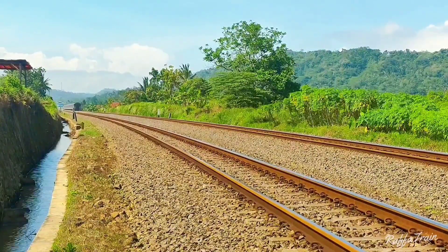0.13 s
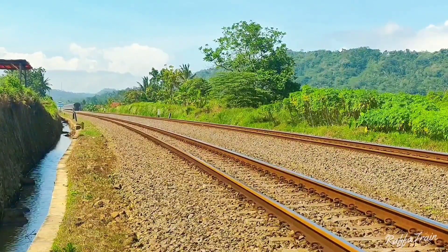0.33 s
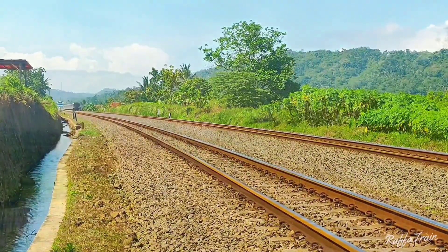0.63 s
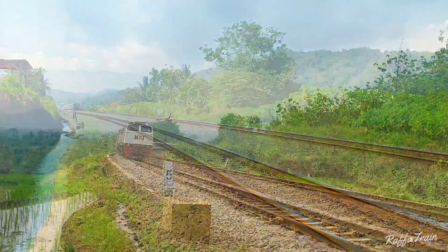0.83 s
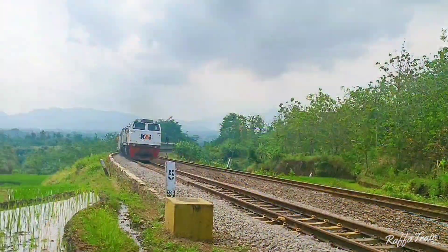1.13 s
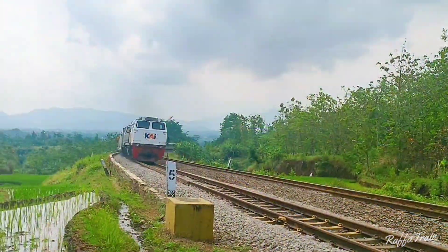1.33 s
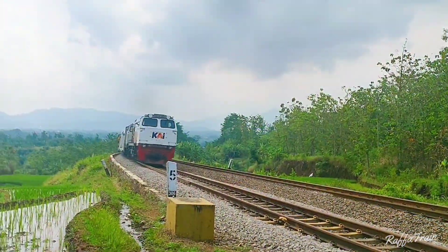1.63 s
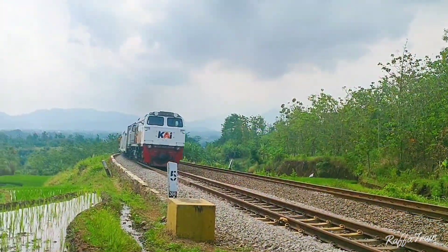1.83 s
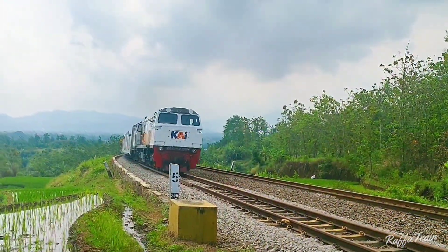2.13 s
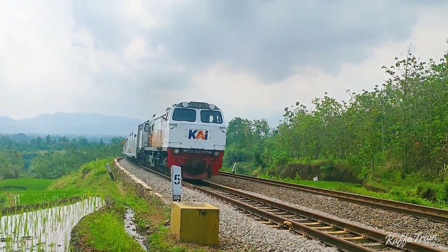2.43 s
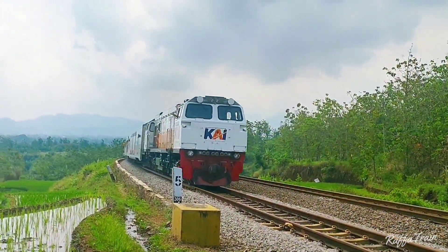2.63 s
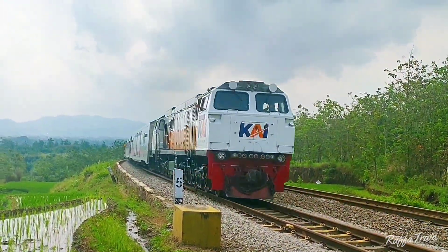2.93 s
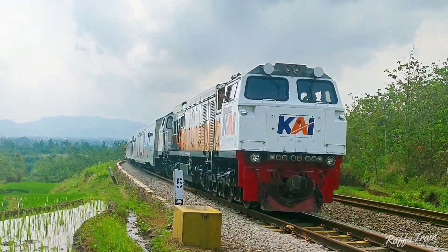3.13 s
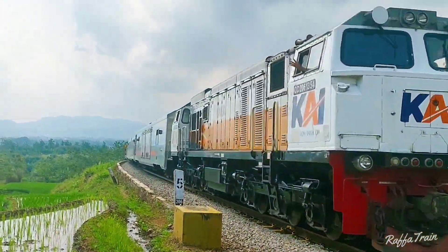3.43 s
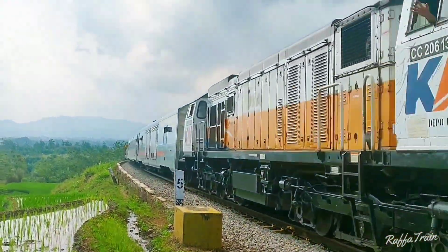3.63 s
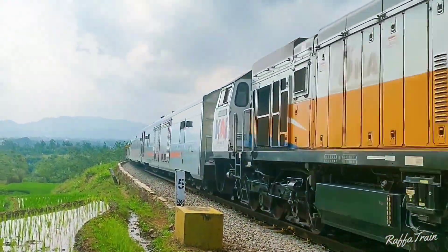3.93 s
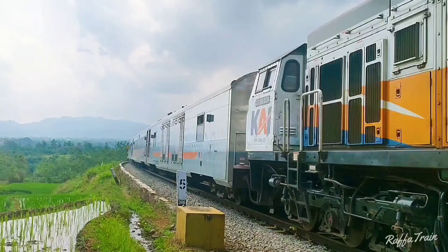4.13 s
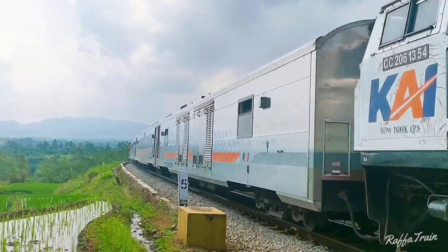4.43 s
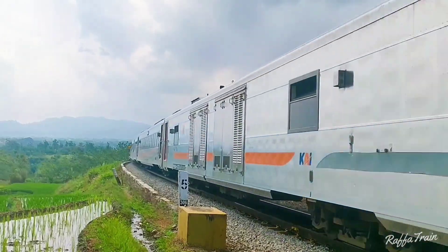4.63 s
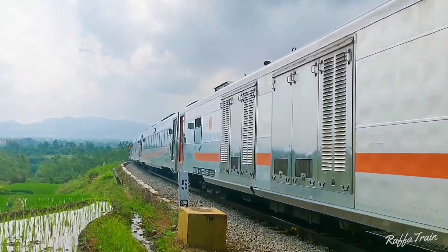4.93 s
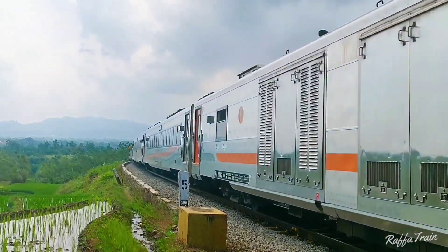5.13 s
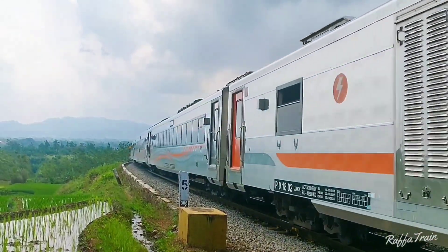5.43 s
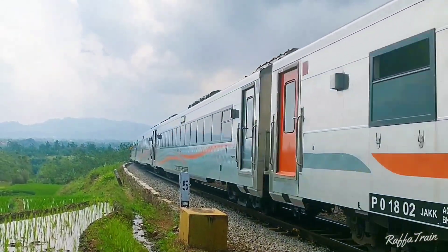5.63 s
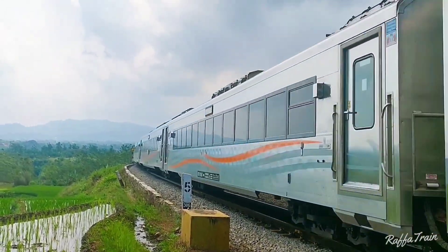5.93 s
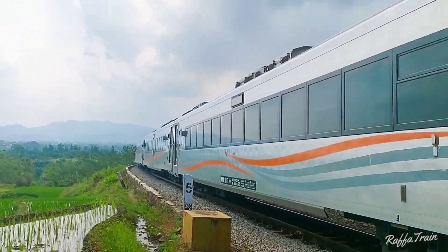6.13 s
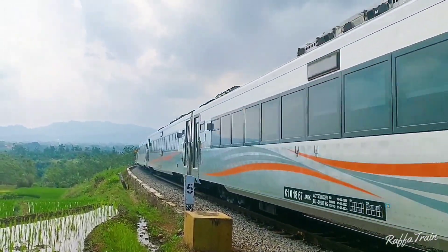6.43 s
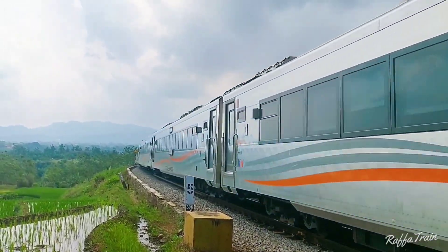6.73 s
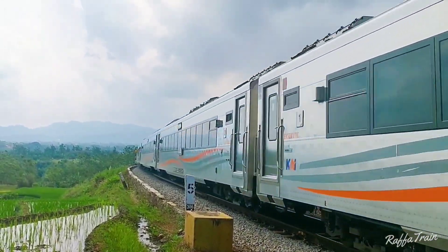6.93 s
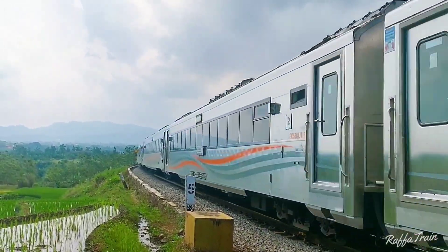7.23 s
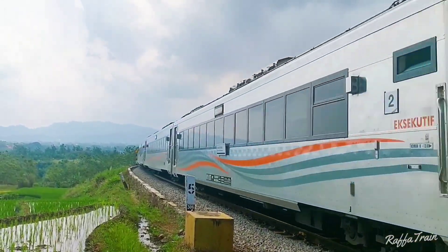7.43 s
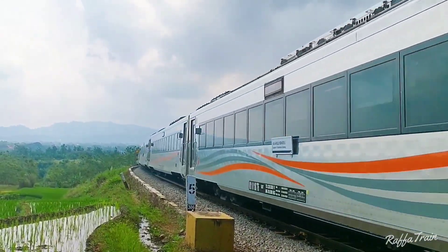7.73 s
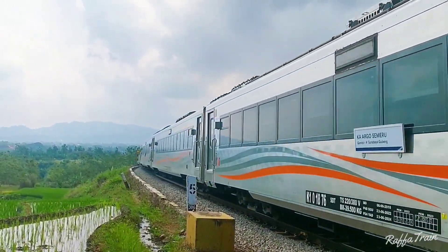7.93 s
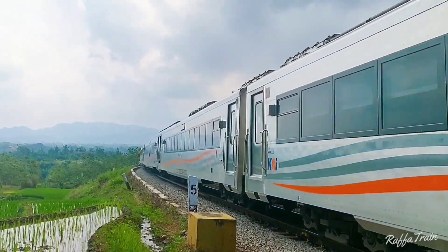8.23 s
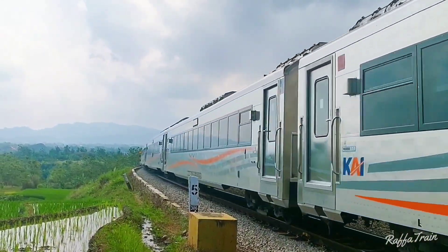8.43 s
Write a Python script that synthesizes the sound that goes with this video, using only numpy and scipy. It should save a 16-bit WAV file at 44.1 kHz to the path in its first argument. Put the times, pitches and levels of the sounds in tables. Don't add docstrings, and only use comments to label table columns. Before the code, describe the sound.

From 0 to about 0.6 s there is only a faint, dull rumble of a distant train, fading into a nearer outdoor scene. At about 0.65 s a two-note air horn blares, reedy and beating; its bright tone closes near 1.35 s, deeper tones linger to 1.8 s and a soft, dull echo trails over the fields. A low diesel throb then grows, with rolling roar swelling from 2.5 s. Around 3.5 to 4.5 s the locomotive passes very close: pulsing exhaust, high turbocharger and gear whine, a burst of fan air, loose metal knocks. From 4.3 s wheels bang over joints, while a generator drone peaks around 4.6 to 5 s, dropping in pitch. Coaches continue to 8.5 s with airy hiss swelling at each set of wheels, sharp ringing clacks and duller farther thuds in uneven clusters, still passing when it ends.

```python
import sys
import numpy as np
from scipy import signal
from scipy.fft import rfft, irfft, next_fast_len
from scipy.io import wavfile
from scipy.ndimage import uniform_filter1d, map_coordinates

SR = 44100
rng = np.random.default_rng(int(sys.argv[2]) if len(sys.argv) > 2 else 0)


def wav_out(sig):
    wavfile.write(sys.argv[1], SR, np.round(np.clip(np.atleast_2d(sig).T, -1, 1) * 32767).astype(np.int16))


def gain_from_db(level_db):
    decades = np.asarray(level_db, float) / 20
    return 10 ** decades


N = 377937

# f/Hz, level/dB per Hz; then t/s, level/dB
FAR_SPECTRUM = [(12, -39), (20, -18), (76, 2.5), (135, 0.5), (387, -18), (753, -10), (2410, -23.5),
                (3270, -36.5), (3760, -56), (5850, -38), (8160, -37), (9370, -50), (15000, -67.5)]
FAR_LEVEL = [(0, -48), (.45, -50), (1.1, -63)]
FADE_START_S, FADE_S = 0.41, 0.75

# f/Hz, level/dB per Hz
RUMBLE = [(12, -52), (20, -13), (48, -11.5), (144, 3), (260, -7.5), (340, -20), (570, -120)]
ROLLING = [(100, -39), (170, -2.5), (281, -2.5), (393, -5.5), (546, -7.5), (901, -17.5), (1010, -17),
           (1500, -39.5), (1950, -49), (3300, -120)]
RAIL = [(650, 0.5), (1100, -2.5), (1270, -3), (1570, -4), (2250, -0.5), (2930, -5), (3840, -14.5),
        (4200, -15.5), (5460, -27), (9240, -120)]
HISS = [(2240, -24), (3800, -14.5), (4760, -9), (5940, -3.5), (6580, 0.5), (7630, -4.5), (8520, -4.5),
        (9560, -13.5), (10500, -22.5), (13600, -51), (22000, -120)]
AIR = [(5880, -27), (10000, -1), (11400, -0.5), (12700, -7.5), (14900, -4), (15700, -10)]
# head of train level/dB, closest t/s, approach/s, leaving/s, extra ground loss/factor,
# coaches level/dB, bogie swell/dB, share of screening/factor
LAYERS = [
    (-32, 3.98, 1.23, 1.1, 1.4, -58, .3, 0.54),
    (-31.3, 3.88, .56, 1.5, 1.83, -40, 2, 1.4),
    (-39.5, 4.26, 0.56, 1.27, 1, -45.5, 2, 1.2),
    (-31, 4.63, 0.6, 1.21, 1.02, -42.5, 7.5, 1.14),
]
# t/s, level/dB
PATH = [(0, 0), (1.2, 2.5), (1.8, 0), (2.4, -2), (3.0, 0.5), (3.35, 0.5), (3.7, 0.5), (4.0, 0.5), (4.5, 0),
        (4.9, 0), (5.25, 2), (5.5, -0.5), (5.9, 1), (6.3, 1.5), (6.9, -0.5), (7.3, 1), (7.8, 0),
        (8.57, -0.5)]

SPEED_M_S, COACH_M, BOGIES_M, AXLES_M = 15.3, 20.95, 13.97, 2.19
FIRST_AXLE_S = 4.286
BOGIE_LAG_S, BOGIE_S = 0.24, 0.127

# t/s, f/Hz
CYCLE = [(0, 9.16), (2.5, 9.135), (4.05, 9.11), (4.43, 8.95), (4.7, 8.63), (5.1, 8.46), (8.57, 8.45)]
# t/s, level/dB
EXHAUST = [(0.4, -29.5), (1.19, -30.5), (1.79, -29.5), (1.97, -24.5), (2.22, -28), (2.61, -23), (3.15, -25),
           (3.38, -29), (3.99, -27.5), (4.11, -32), (4.49, -19), (4.75, -35), (5.2, -31), (5.72, -26),
           (6.2, -25.5), (7.11, -28), (7.98, -37), (8.57, -37)]
# multiple of the cycle, level/dB
ORDER_LEVELS = [(4, -14), (5, -31), (6, -22), (7, -25), (8, -16), (9, -22), (10, -20), (11, -11), (12, 1),
                (13, -9), (14, -8), (15, -6), (16, -12), (17, -3), (18, -11), (19, -12), (20, -13),
                (21, -7), (22, -24), (23, -13), (24, -22), (25, -13), (26, -16), (27, -25), (28, -16),
                (29, -14), (30, -18), (31, -23), (32, -30), (33, -24)]
# level/dB, closest t/s, approach/s, leaving/s, level from afar/dB
STACK = (-14, 4, 0.36, 0.2, -30.5)
# level/dB, closest t/s, approach/s, leaving/s
TURBO = (-37.5, 4.4, .68, 1.1)
GEARS = (-33, 4, 0.54, .5)

# t/s, f/Hz
LOW_PITCH = [(.7, 299), (.75, 297.3), (.8, 296.7), (2.2, 296.6)]
HIGH_PITCH = [(.6, 409), (.705, 412), (.725, 434), (.8, 432.2), (2.2, 432)]
# f/Hz, level/dB
LOW_TONES = [(297, -5), (593, 0.5), (890, -1.5), (1187, 6.5), (1483, -3.5), (1780, -6), (2077, -24),
             (2374, 3), (2670, -12.5), (3260, -22.5), (4500, -19.5), (5900, -12), (7100, -14.5),
             (8600, -16.5), (10000, -44), (15000, -57)]
HIGH_TONES = [(432, 2), (824, 6), (864, 4.5), (1297, -1.5), (1729, -15), (2161, -15), (2470, 1),
              (2593, -18), (3025, -20.5), (5400, -27), (5620, -18), (6050, -14), (8200, -22), (15000, -70)]
# start t/s, deep overtones level/dB, bright overtones level/dB, deep swell/dB per s,
# deep hang until t/s, then fall/dB per s, reed start/s
BELLS = [
    (0.69, -25, -36, -3, 1.8, 90, 0.056),
    (0.629, -37.5, -28.5, 10, 1.72, 90, .115),
]
SHUT_S, SAG_DB_S, BRIGHT_FALL_DB_S, ATTACK_DB = 1.34, 5.5, 58, 21.5
ECHO_DB, ECHO_T60_S, ECHO_TOP_HZ, ECHO_SMEAR_HZ = -26, 1.5, 1300, 160

# f/Hz, level/dB per Hz
FANS = (-37.5, 4, 0.25, 0.13)
FAN_AIR = [(800, -40), (1100, 1), (1700, -3.5), (2400, -37)]

# t/s, peak level/dB, thud f/Hz, ring
# level/dB, rattle level/dB
KNOCKS = [(3.47, -13, 330, -26, -30), (3.798, -18, 224, -28, -15), (4.019, -18, 466, -20, -14),
          (4.654, -11.5, 237, -22, -28), (4.694, -14.5, 298, -12, -20), (5.075, -16, 252, -20, -11),
          (5.135, -11.5, 270, -11, -17), (5.262, -14.5, 300, -12, -24)]
# axle arrival after the nearest joint t/s, peak level/dB, thud f/Hz, ring level/dB,
# rattle level/dB, swell/s
JOINTS = [
    (0, -10.5, 460, -10.5, -20.5, .011),
    (.758, -6.5, 258, -22.5, -36, 0.0078),
    (.992, -8.5, 275, -28, -31, .009),
]
AXLE_DB = [(0, -1, -0.97, -1), (0, -0.92, -0.51, -1.5), (0, -1, 1, -2.5)]
AXLE_RING_DB = [0, 3, -1.5, 2.5]
AXLE_RATTLE_DB = [-4, 3, -1, 4]
VEHICLE_DB = [-5, -0.5, 0, 0.5]
VEHICLE_RING_DB = [-9, 0, 0, 1]
# f/Hz, width/Hz, level/dB
WHEEL = [(800, 330, -3), (1984, 83, 1.5), (2125, 26, 6), (2370, 117, 0.5), (2630, 150, -7.5)]
# f/Hz, level/dB per Hz
RATTLE = [(1760, -31), (3000, -2.5), (4210, -8), (5760, -5), (8430, -0.5), (12800, -19), (13900, -22),
          (15700, -26)]

# t/s, firing f/Hz, level/dB
VAN = [(3.9, 151, -47), (4.45, 150.4, -20), (4.65, 148, -12), (5.03, 142.6, -13), (5.12, 141.2, -27.5),
       (6.5, 140.5, -24.5), (6.9, 140.5, -32), (7.2, 140.5, -24), (7.4, 140.5, -32.5), (8.57, 140.5, -37.5)]
# multiple of the shaft, level/dB
VAN_ORDERS = [(1, -33), (3, -1.5), (5, -14.5), (6, -21.5)]

# f/Hz, level against the neighbourhood/dB
MASKING = [(1500, -38), (2500, -3.5), (3500, 2), (5100, 2), (6200, -1.5), (8500, 0.2), (9800, 2),
           (13000, 2.5), (14200, 2.5), (15500, 1.7)]


def unit(x):
    return x / np.sqrt(np.mean(x ** 2, axis=-1, keepdims=True) + 1e-20)


def along(points, hz):
    f, v = np.transpose(points)
    return np.interp(np.log(hz + 1), np.log(f + 1), v)


def curves(rows):
    s, *cols = np.transpose(rows)
    return [np.interp(np.arange(N) / SR, s, c) for c in cols]


def wobble(rate, size=N):
    knots = rng.standard_normal(int(N * 60 / SR) + 4)
    return map_coordinates(knots, [np.arange(size) * min(rate, 59) / SR], order=1)


def turns(hz):
    return 2 * np.pi * np.cumsum(hz) / SR


def rush(spectrum, patchy_db):
    z = signal.stft(rng.standard_normal(N + 512), nperseg=512)[2]
    field = uniform_filter1d(uniform_filter1d(rng.standard_normal(z.shape), 5, 0), 10, 1)
    x = signal.istft(z * gain_from_db(patchy_db * field / field.std()), nperseg=512)[1]
    m = next_fast_len(len(x))
    gain = gain_from_db(along(spectrum, np.fft.rfftfreq(m, 1 / SR)))
    return unit(irfft(rfft(x, m) * gain, m)[:N])


def passing(db, at_s, approach_s, leaving_s):
    t = np.arange(N) / SR - at_s
    return db - 10 * np.log10(1 + (t / np.where(t < 0, approach_s, leaving_s)) ** 2)


def distance():
    return gain_from_db(curves(FAR_LEVEL)[0] + 1.5 * wobble(10.2)) * rush(FAR_SPECTRUM, patchy_db=2.2)


def fade():
    return np.clip((np.arange(N) / SR - FADE_START_S) / FADE_S, 0, 1)


def axles():
    vehicle_m = COACH_M * np.arange(len(VEHICLE_DB))[:, None]
    metres = vehicle_m + [0, AXLES_M, BOGIES_M, BOGIES_M + AXLES_M]
    return FIRST_AXLE_S + metres / SPEED_M_S


def layer_db(db, at_s, approach_s, leaving_s, loss, coaches_db, swell_db, screened):
    t = np.arange(N) / SR
    bogie_starts = axles()[:, ::2].ravel()
    bogies = sum(np.exp(-((t - s - BOGIE_LAG_S) / BOGIE_S) ** 2) for s in bogie_starts)
    head = db + loss * passing(0, at_s, approach_s, leaving_s)
    coaches = passing(coaches_db, at_s + 1, approach_s, 27) + swell_db * bogies
    return 10 * np.log10(gain_from_db(2 * head) + gain_from_db(2 * coaches)) + screened * curves(PATH)[0]


def roar():
    rumble_db, rolling_db, rail_db, hiss_db = (layer_db(*row) for row in LAYERS)
    shake = wobble(14)
    rumble = gain_from_db(rumble_db + 9) * rush(RUMBLE, patchy_db=2)
    rolling = gain_from_db(rolling_db + 12.5 + 1.8 * wobble(9)) * rush(ROLLING, patchy_db=0.5)
    air_db = hiss_db - 12.0 + 0.61 * (hiss_db + 34) + 1.2 * shake
    air = gain_from_db(air_db) * rush(AIR, patchy_db=3.5)
    rail = gain_from_db(rail_db + 10.5 + 0.74 * shake) * rush(RAIL, patchy_db=1.4)
    hiss = gain_from_db(hiss_db + 0.6 * shake) * rush(HISS, patchy_db=2.5)
    return rumble + rolling + air + rail + hiss


def engine():
    cycle = curves(CYCLE)[0]
    phase = turns(cycle) + 1.292
    low_db = curves(EXHAUST)[0]
    high_db = np.maximum(passing(*STACK[:4]), STACK[4])
    behind_db = curves([(4.3, 0), (5.3, -25)])[0]
    turbo_db, gear_db = (db + 2 * passing(0, *way) for db, *way in (TURBO, GEARS))
    turbo_hz = 793 * cycle * (1 + 0.0042 * wobble(50))
    gear_hz = 116.3 * cycle * (1 + 0.01006 * wobble(30))
    out = gain_from_db(turbo_db + 3.3 * wobble(24.1)) * np.sin(turns(turbo_hz))
    out += gain_from_db(gear_db + 1.9 * wobble(15)) * np.sin(turns(gear_hz))
    for k, db in ORDER_LEVELS:
        high = np.clip((k - 20) / 5, 0, 1)
        level = db + (1 - high) * low_db + high * (high_db + 4.0)
        level += (k != 12) * (behind_db - 2.5) + 0.18 * behind_db
        level += 1.5 * wobble(1.5) + (1.2 - .1 * behind_db) * wobble(11)
        drift = rng.normal(0, .45) + (.45 - .03 * behind_db) * wobble(5)
        out += np.sqrt(2) * gain_from_db(level) * np.sin(k * phase - .08 * k ** 2 + drift)
    return out


def blast(start, deep_db, bright_db, swell, hang_s, fall, attack_s, size):
    t = np.arange(size) / SR
    attack_db = -ATTACK_DB * np.clip(1 - (t - start) / attack_s, 0, 1)
    deep = deep_db + swell * (np.minimum(t, hang_s) - 1) - fall * np.maximum(t - hang_s, 0)
    bright = bright_db - SAG_DB_S * (t - 1) - BRIGHT_FALL_DB_S * np.maximum(t - SHUT_S, 0)
    return deep + attack_db, bright + attack_db


def bell(levels, hz, tones, beat, split_hz, flutter_db, side_db, count):
    size = len(hz)
    t = np.arange(size) / SR
    deep_db, bright_db = blast(*levels, size=size)
    phase, out = turns(hz), np.zeros(N)
    opening = np.clip((t - levels[0]) / .035, 0, 1)
    soft_start = np.clip((.76 - t) / .06, 0, 1)
    for k in range(1, count + 1):
        bright = 1 / (1 + (split_hz / (k * hz[-1])) ** 6)
        db = along(tones, k * hz) + (1 - bright) * deep_db + bright * bright_db
        db += flutter_db * (0.73 + bright) * wobble(22.1, size)
        db += (.3 + 1.8 * bright) * wobble(6.99, size)
        db -= 14 * soft_start * (k * hz > 2600)
        own = k * phase + .35 * k + rng.normal(0, .4) + .032 * k * wobble(55, size)
        side = gain_from_db(side_db + 3 * wobble(15, size)) * np.clip(k * hz[-1] / 3000 - .4, 0, 1)
        out[:size] += np.sqrt(2) * opening * gain_from_db(db) * (np.sin(own) + side * np.sin(own - beat))
    return out


def horn():
    end = round(2.3 * SR)
    low_hz, high_hz = (curves(pitch)[0][:end] * (1 + 0.00072 * wobble(40.14, end))
                       for pitch in (LOW_PITCH, HIGH_PITCH))
    beat = turns(3 * low_hz - 2 * high_hz)
    low = bell(BELLS[0], low_hz, LOW_TONES, beat, split_hz=1080, flutter_db=1.33, side_db=1.0, count=50)
    high = bell(BELLS[1], high_hz, HIGH_TONES, beat, split_hz=900, flutter_db=1.5, side_db=-30, count=30)
    band = signal.butter(2, [900, 3200], "band", fs=SR, output="sos")
    mixed = signal.sosfilt(band, low * high)
    rasp = np.abs(np.diff(low + high, prepend=0)) * rush(HISS, patchy_db=0.0)
    return low + high + gain_from_db(8.5) * mixed + gain_from_db(-10.5) * rasp


def fields(x):
    t = np.arange(SR) / SR
    dull = signal.butter(2, ECHO_TOP_HZ, fs=SR, output="sos")
    tail = signal.sosfilt(dull, rng.standard_normal(SR)) * gain_from_db(-60 * t / ECHO_T60_S)
    smear = unit(uniform_filter1d(rng.standard_normal(N), max(round(SR / ECHO_SMEAR_HZ), 1)))
    return signal.fftconvolve(x * smear, tail / np.linalg.norm(tail))[:N]


def fans():
    return gain_from_db(passing(*FANS) + 1.8 * wobble(12)) * rush(FAN_AIR, patchy_db=2.5)


def blows():
    rows = []
    for (lag, db, hz, ring_db, rattle_db, swell), axle_db in zip(JOINTS, AXLE_DB):
        for times, load, damped in zip(axles(), VEHICLE_DB, VEHICLE_RING_DB):
            for s, axle, bright, shaken in zip(times, axle_db, AXLE_RING_DB, AXLE_RATTLE_DB):
                rows.append((s + lag, db + load + axle, hz, ring_db + bright + damped,
                             rattle_db + shaken, swell))
    rows += [(*knock, .009) for knock in KNOCKS]
    return [row for row in rows if row[0] < N / SR]


def joints():
    size = 8192
    out, t, f = np.zeros(N + size), np.arange(size) / SR, np.fft.rfftfreq(size, 1 / SR)

    def mode(centre, width):
        return 1j * f * width / (centre * centre - f * f + 1j * f * width)

    def shape(rise, fall):
        return (1 - np.exp(-(t / rise) ** 2)) * np.exp(-(t / fall) ** 1.343)

    wheel = sum((-1) ** k * gain_from_db(db) * mode(c, w) for k, (c, w, db) in enumerate(WHEEL))
    metal = gain_from_db(along(RATTLE, f))
    for s, db, hz, ring_db, rattle_db, swell in blows():
        noise = rfft(rng.standard_normal((3, size)))
        swell = max(swell, .002)
        hz = hz * (1 + 0.057 * rng.normal())
        rattle_db = rattle_db + .9 * rng.normal()
        boom = signal.hilbert(irfft(noise[0] * mode(hz, 0.5 * hz) * mode(0.917 * hz, 1.07 * hz)))
        steady = (boom / np.abs(boom) ** 0.58).real
        thud = shape(1.35 * swell, 0.022 + 1.2 * swell) * steady
        thud /= np.abs(thud).max()
        ring = shape(1.3 * swell, 0.053 + swell) * unit(irfft(noise[1] * wheel))
        rattle = shape(2.8 * swell, 0.088 + swell) * unit(irfft(noise[2] * metal))
        start = round((s - .008) * SR)
        blow = thud + gain_from_db(ring_db) * ring + gain_from_db(rattle_db + 2) * rattle
        out[start:start + size] += gain_from_db(db - 0.5) * blow
    return out[:N]


def van():
    firing, db = curves(VAN)
    db[:round(VAN[0][0] * SR)] = -120
    phase, out = turns(firing / 3), np.zeros(N)
    flutter_db, sway = np.clip(-.3 * db - 3, 1, 4.5), np.clip(-.06 * db - .5, .3, 1)
    for k, level in VAN_ORDERS:
        gain = np.sqrt(2) * gain_from_db(db + level + flutter_db * wobble(12))
        out += gain * np.sin(k * phase + sway * wobble(10))
    return out


def scene():
    far, wheels, blown = distance(), roar(), horn()
    train = wheels + blown + engine() + van() + joints() + fans() + gain_from_db(ECHO_DB) * fields(blown)
    return (far + fade() * train)[None]


def drop_masked(x):
    hz, _, z = signal.stft(x, SR, nperseg=2048)

    def smooth(v, bins):
        return uniform_filter1d(uniform_filter1d(v, bins, 0), 2, 1)

    power = np.abs(z) ** 2 + 1e-20
    near_db = 10 * np.log10(np.abs(smooth(power, 8)))
    around_db = smooth(10 * np.log10(power), 40)
    margin_db = near_db - around_db - along(MASKING, hz)[:, None]
    kept = (hz[:, None] < 15520) / (1 + gain_from_db(-20 * np.clip(margin_db, -3, 3)))
    return signal.istft(z * kept, SR, nperseg=2048)[1][:N]


def band_limit(x):
    return signal.sosfilt(signal.butter(12, 15890, fs=SR, output="sos"), x)


def record(dry):
    rounded = dry / (1 + np.abs(dry / .66) ** 4) ** (1 / 4)
    return band_limit(drop_masked(rounded[0])[None])


dry = scene()
out = record(dry)
wav_out(out)
```